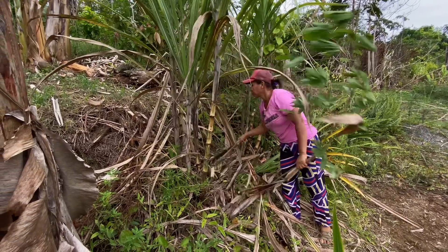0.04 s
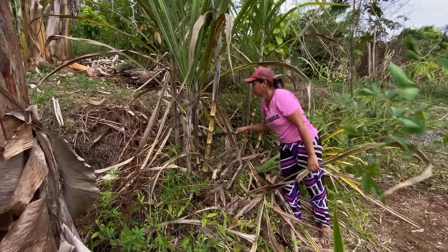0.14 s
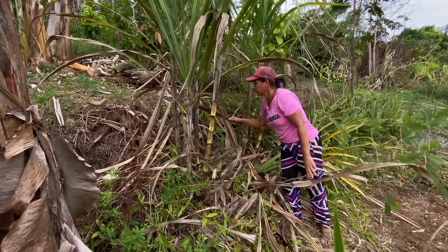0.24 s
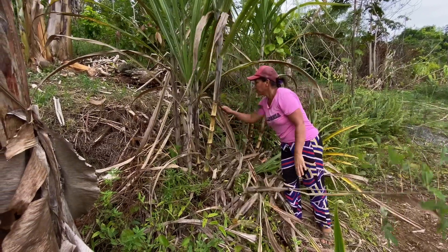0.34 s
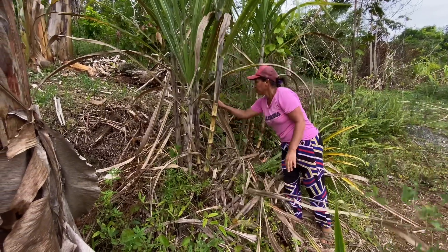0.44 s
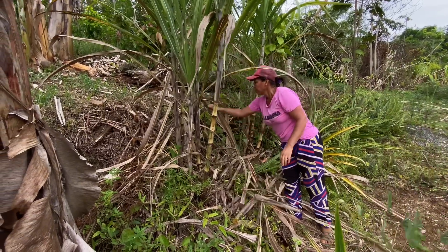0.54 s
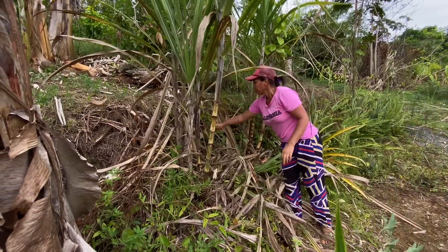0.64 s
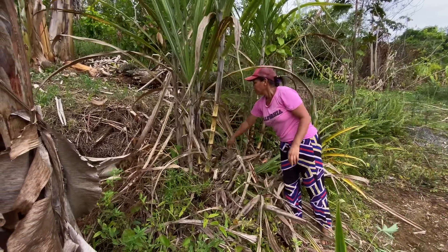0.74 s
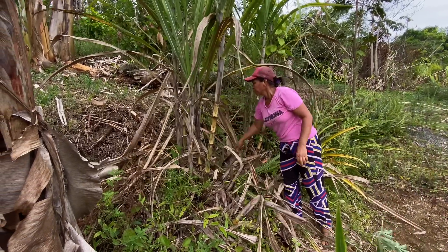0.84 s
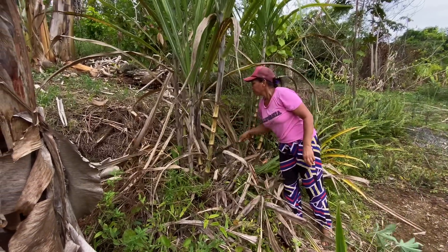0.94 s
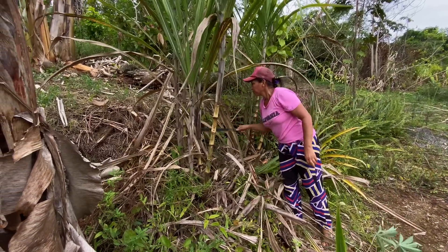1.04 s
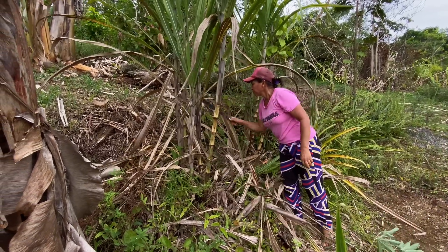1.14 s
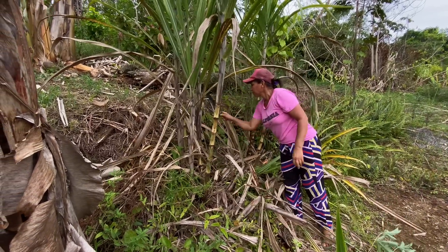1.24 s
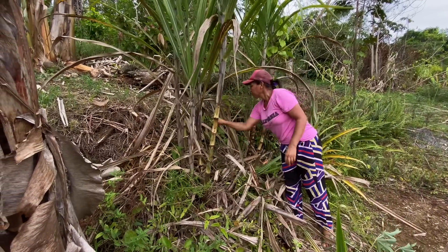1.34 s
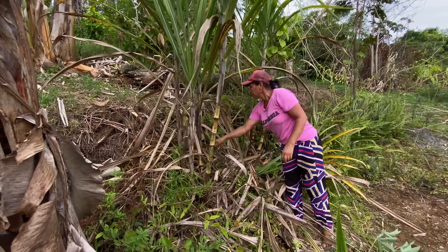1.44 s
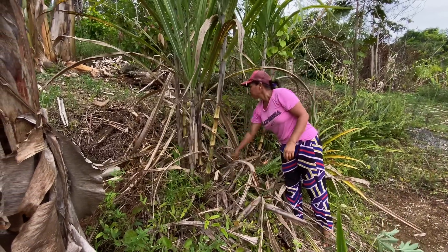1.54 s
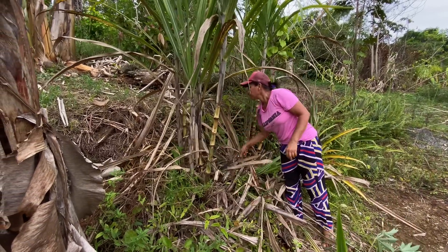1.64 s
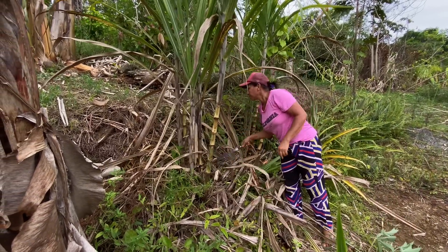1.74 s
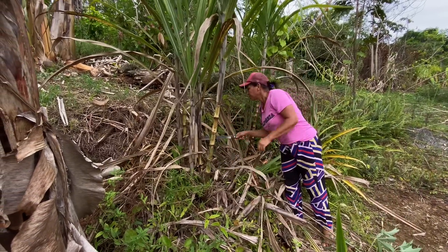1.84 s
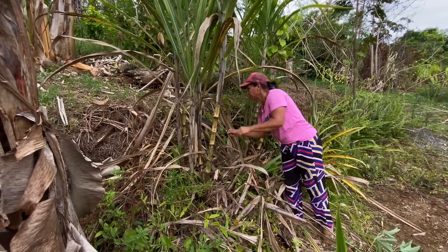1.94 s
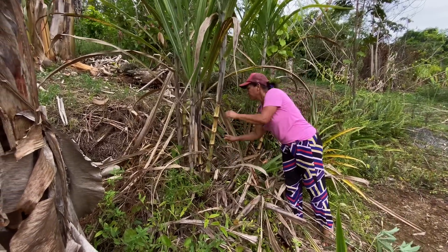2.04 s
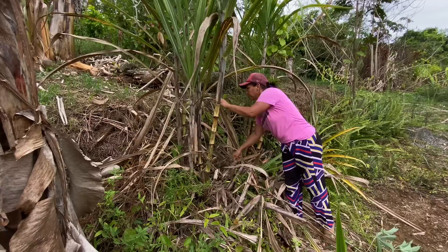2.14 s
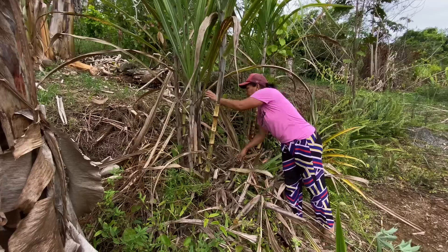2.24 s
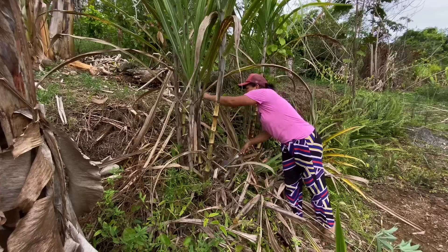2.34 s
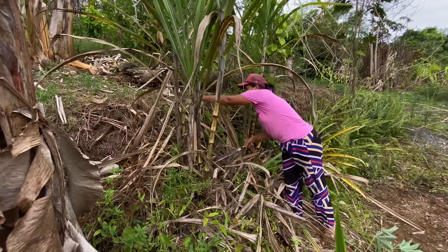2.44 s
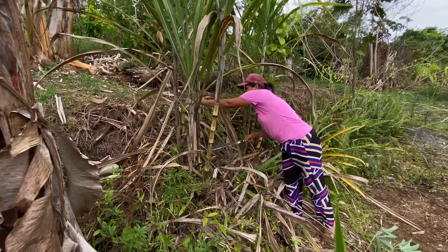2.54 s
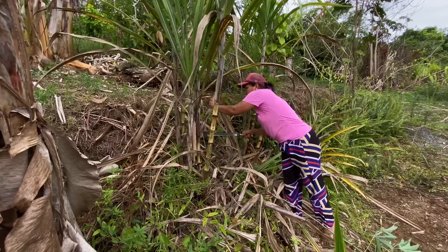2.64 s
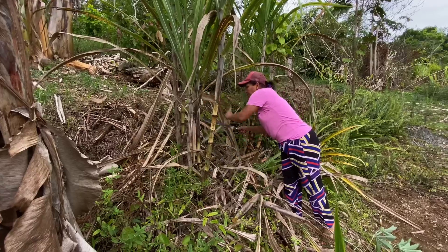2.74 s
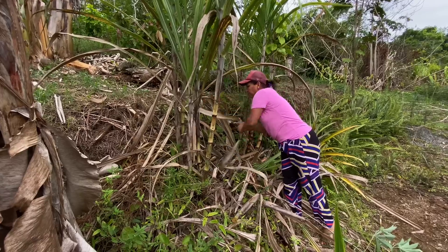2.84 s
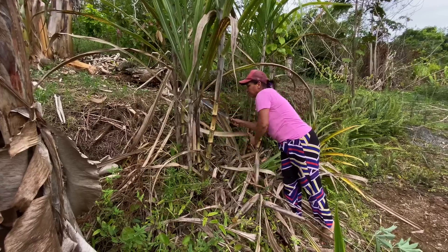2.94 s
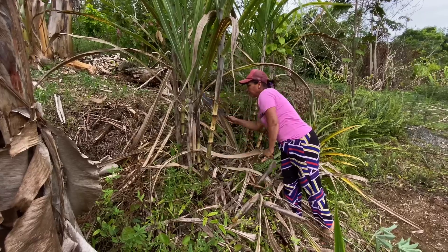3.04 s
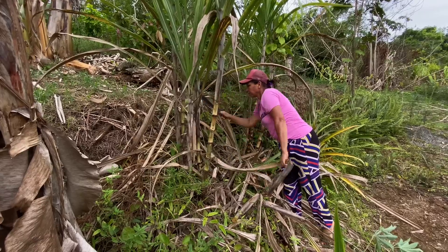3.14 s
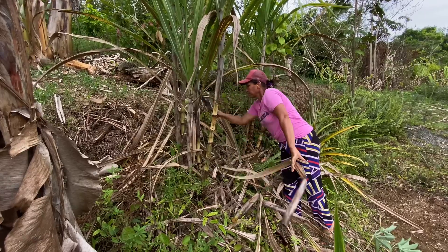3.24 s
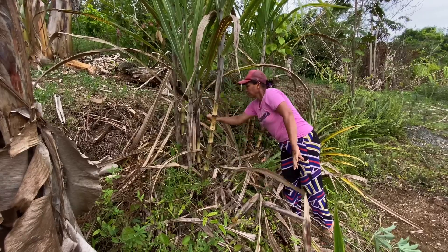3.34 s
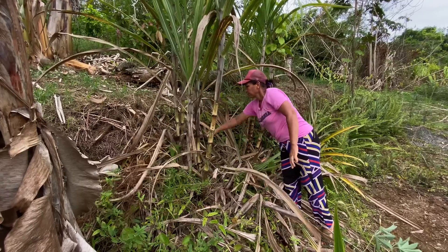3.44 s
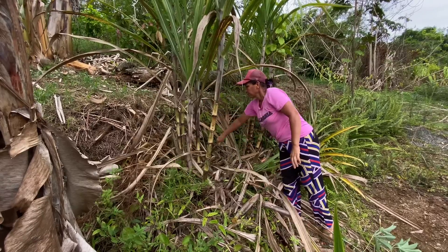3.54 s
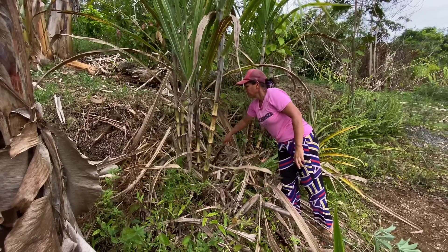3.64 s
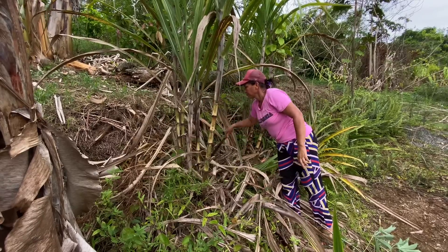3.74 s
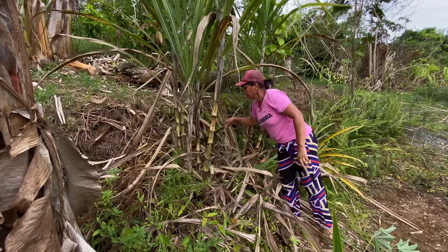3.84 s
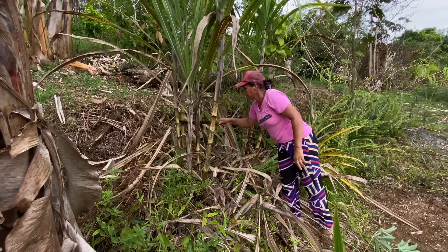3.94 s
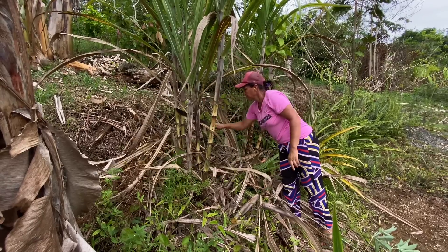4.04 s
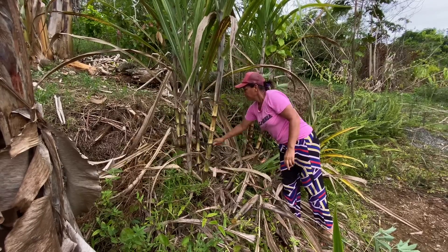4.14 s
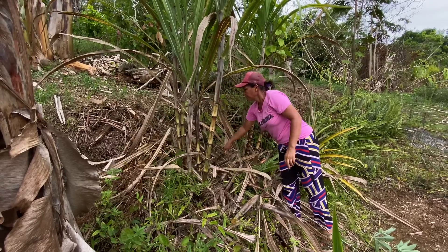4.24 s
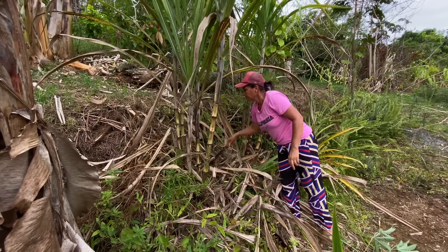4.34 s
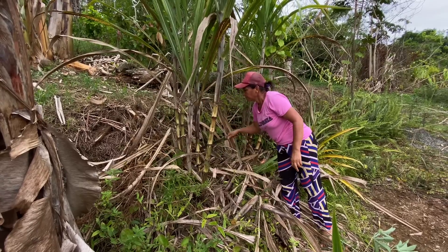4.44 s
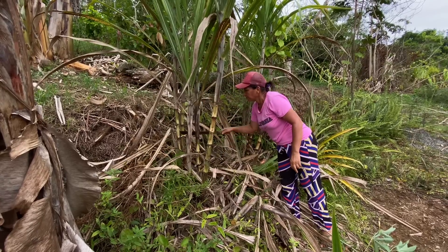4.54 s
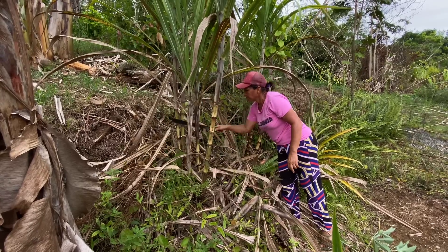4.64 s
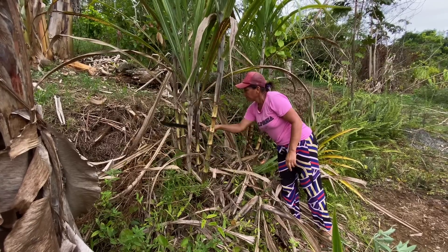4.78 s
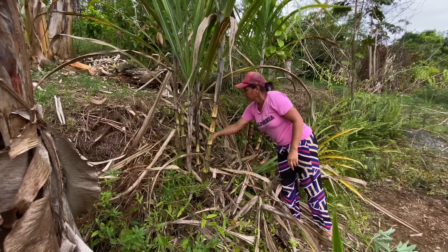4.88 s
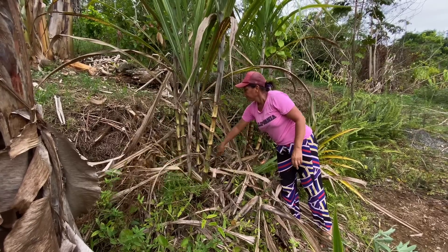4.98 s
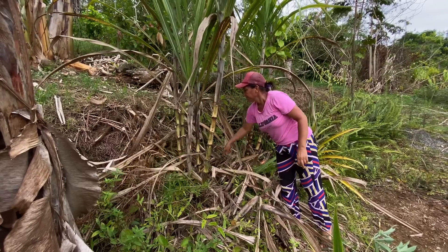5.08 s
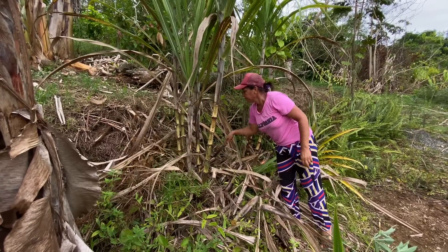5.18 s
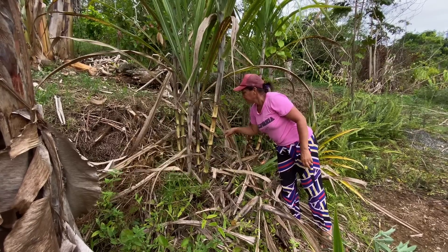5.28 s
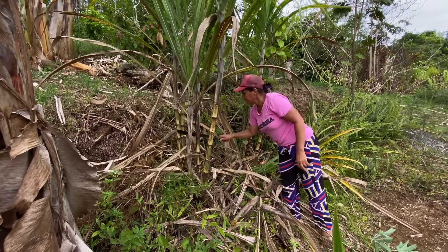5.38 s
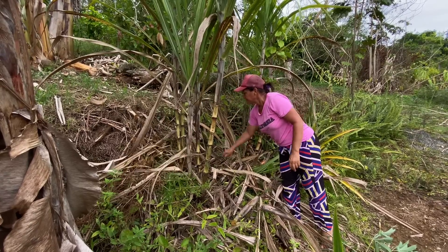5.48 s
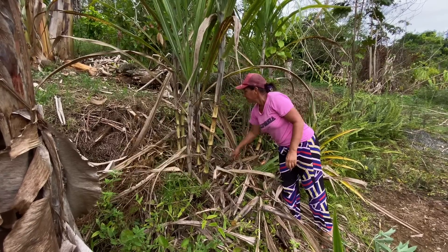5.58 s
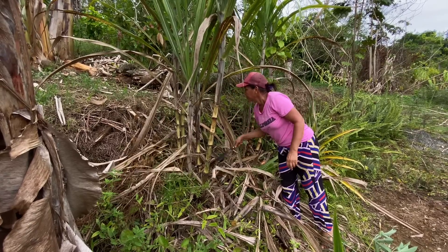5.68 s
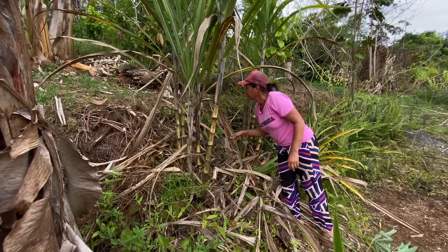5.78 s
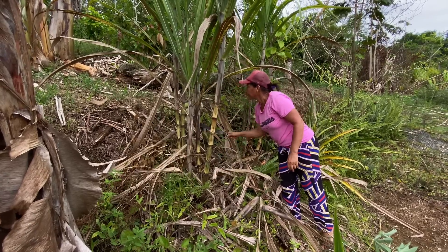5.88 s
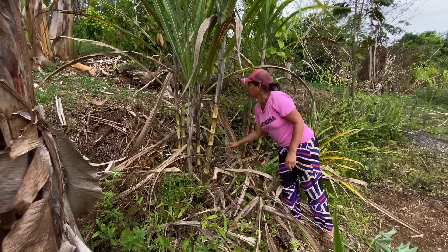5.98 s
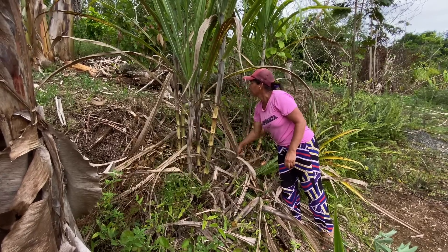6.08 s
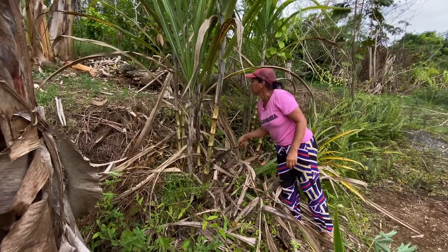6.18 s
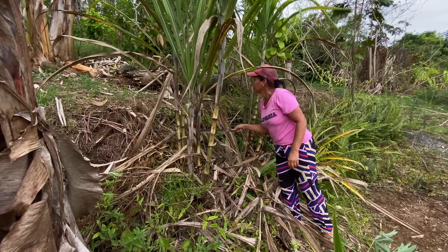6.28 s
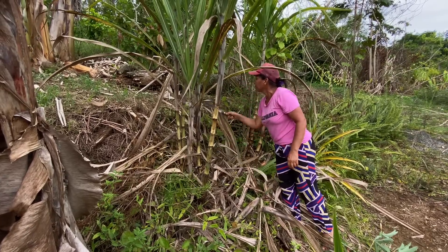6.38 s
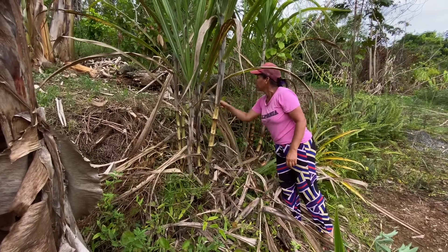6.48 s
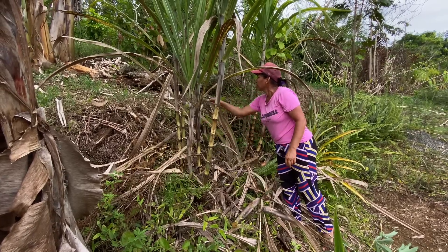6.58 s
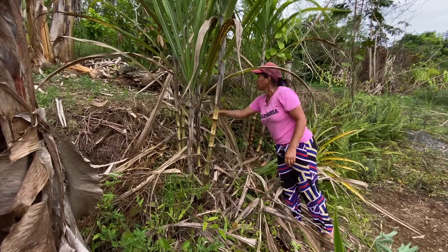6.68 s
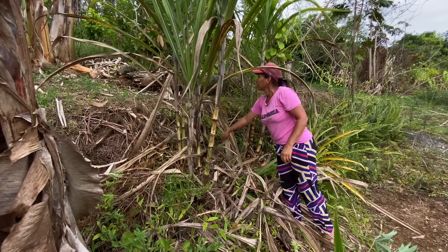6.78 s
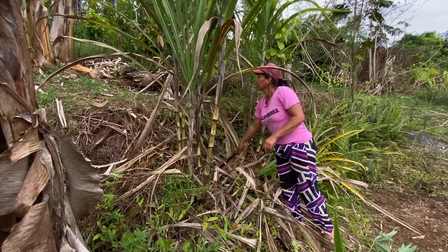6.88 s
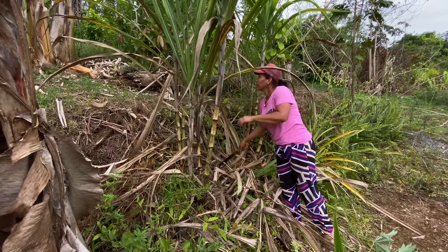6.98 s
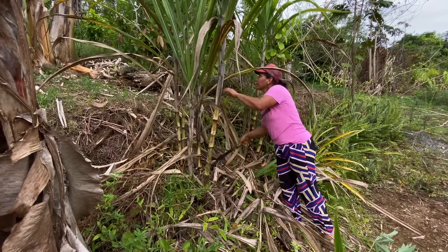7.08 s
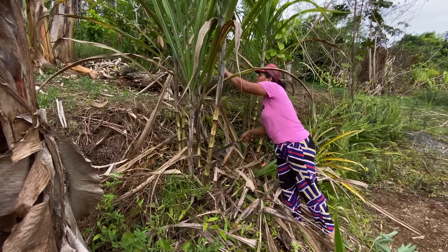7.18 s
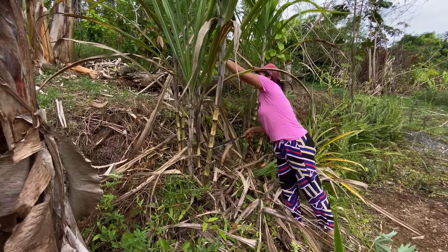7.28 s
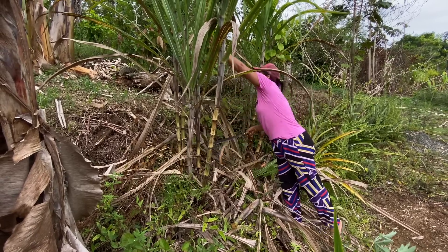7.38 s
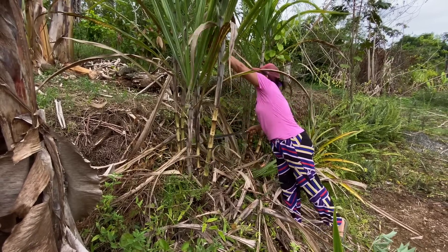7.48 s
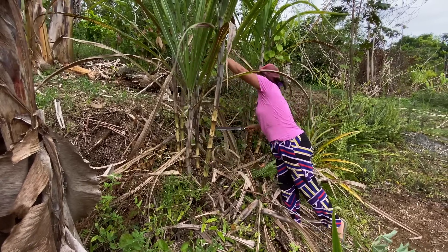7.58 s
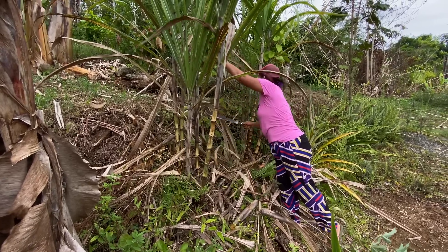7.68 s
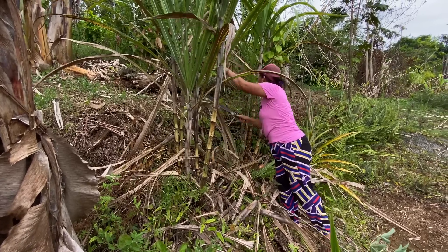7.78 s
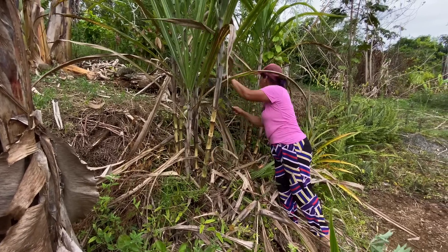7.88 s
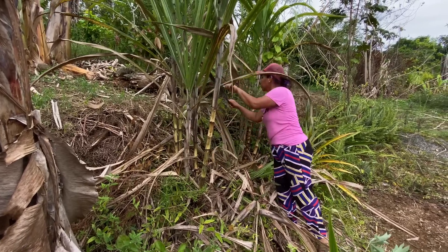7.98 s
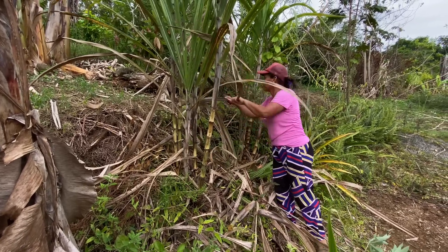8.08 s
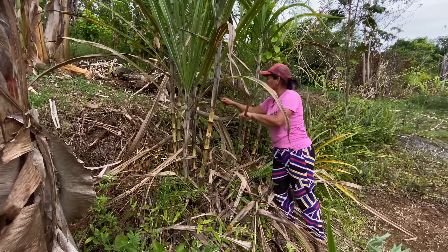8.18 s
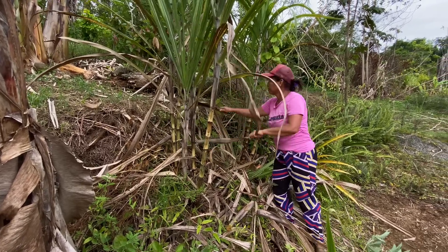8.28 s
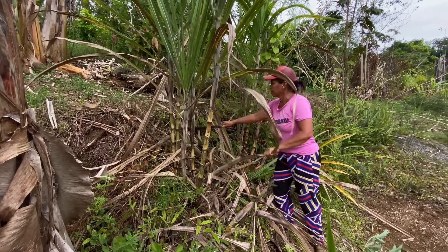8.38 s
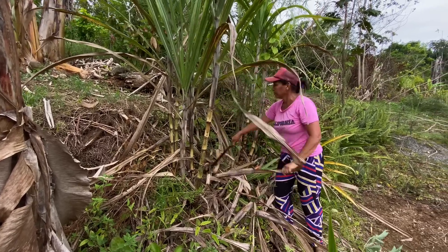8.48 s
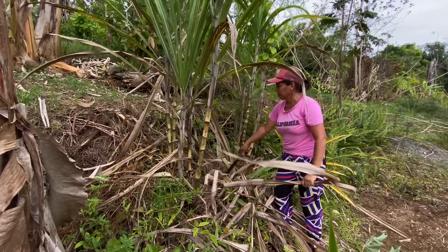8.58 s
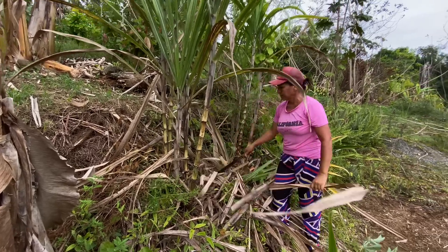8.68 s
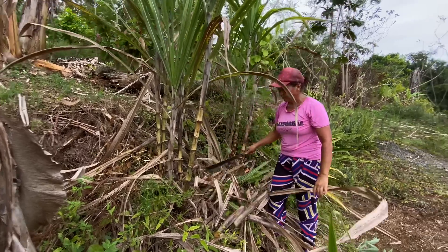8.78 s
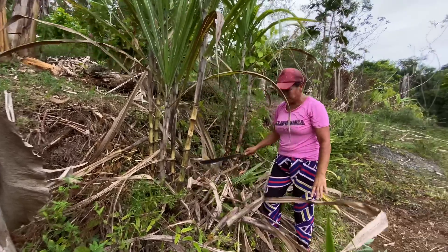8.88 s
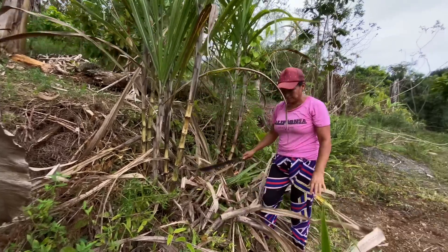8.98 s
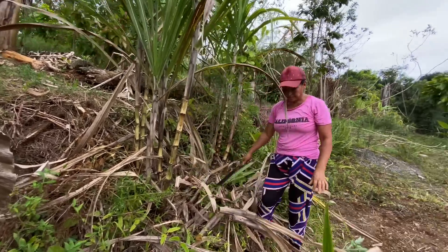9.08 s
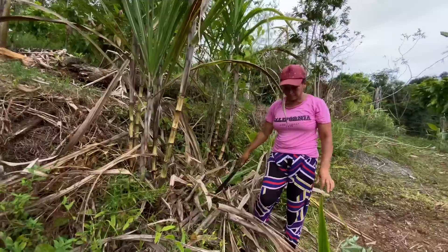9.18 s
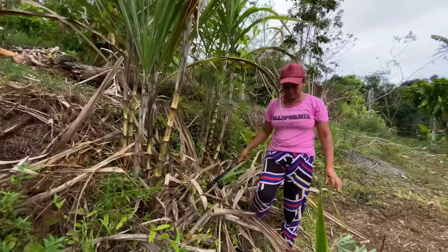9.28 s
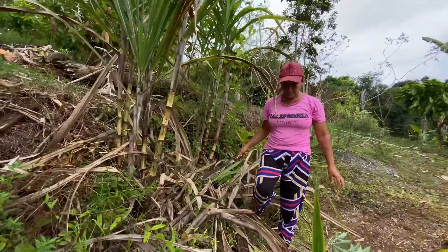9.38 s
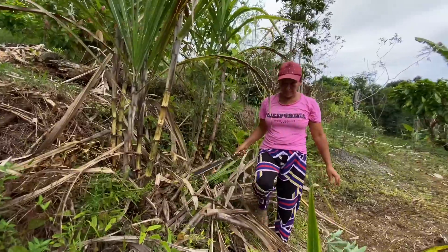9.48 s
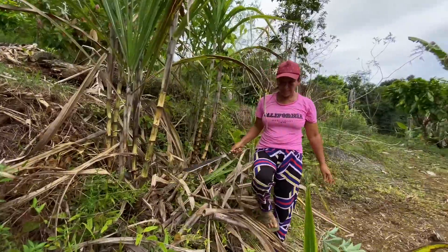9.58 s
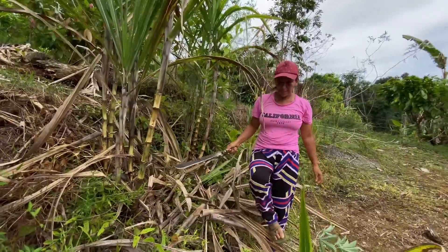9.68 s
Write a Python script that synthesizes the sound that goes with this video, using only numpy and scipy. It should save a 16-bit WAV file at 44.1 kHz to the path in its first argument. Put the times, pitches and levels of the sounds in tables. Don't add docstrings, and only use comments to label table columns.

```python
import sys
import numpy as np
from scipy import signal
from scipy.fft import rfft, irfft, next_fast_len
from scipy.io import wavfile
from scipy.ndimage import uniform_filter1d

SR = 44100
rng = np.random.default_rng(int(sys.argv[2]) if len(sys.argv) > 2 else 0)


def boost_factor(decibels):
    exponent = np.asarray(decibels, float) / 20
    return 10 ** exponent


def to_wav(sig):
    pcm = np.clip(np.atleast_2d(sig), -1, 1) * 32767
    pcm = np.round(pcm).astype(np.int16)
    wavfile.write(sys.argv[1], SR, pcm.T)


N = 428652

# start in seconds, rustle in dB, shaking in seconds,
# settling in dB per second, ribs in dB relative to the rustle.
STROKES = [(0.0, -31, 0.011, 43, -7.5), (0.599, -29, 0.031, 46, -6), (1.37, -53, .02, 44, 3.5),
           (1.45, -37, 0.2, 119, -12), (2.146, -38, 0.052, 55, -5), (3.395, -28.5, 0.13, 56.5, -5.5),
           (4.187, -38.5, 0.015, 70.5, -4), (4.818, -38, 0.17, 41.5, -8.5), (5.49, -42.5, 0.13, 67, -6),
           (6.015, -40.5, 0.14, 38, -6.5), (6.672, -40.5, 0.27, 23, -7.5), (9.06, -36.5, 0.37, 35, -7)]
SHAKE_RISE_S = 0.035
JOLTS_PER_S, JOLT_S, JOLT_DB = 60, 0.012, 1.2

# time in seconds, rustle in dB, ribs in relative dB.
HANDS = [(.3, -59, 12), (.5, -49, -3.5), (1.3, -67.5, -3.5), (1.72, -58.5, 2.5), (1.9, -63.5, -2.5),
         (2.1, -60, -3.5), (2.3, -53, -6), (2.57, -48, -8), (2.7, -44.5, -6), (2.8, -43, -1.5),
         (2.862, -49, -3), (2.92, -48, 2), (3.1, -45, -9), (3.3, -43.5, -5), (3.365, -46, -10),
         (3.6, -85, -4), (7.3, -95, 13), (7.46, -60, 3), (7.56, -55.5, 0), (7.68, -45, -19),
         (7.73, -43.5, -6), (7.8, -32, -11), (8.0, -42.5, -4), (8.32, -31.5, -13), (8.42, -46.5, -3.5),
         (8.55, -39, -3), (8.78, -47.5, -6.5), (9.03, -48, -3), (9.2, -73, -5)]

# peak in seconds, crackle in dB, knock in relative dB,
# knock pitch in Hz, time to fall 60 dB in seconds.
SNAPS = [(1.399, -19.5, -5, 1070, 0.15), (2.589, -44.5, 6.5, 430, 0.092), (2.618, -29.5, -12, 1710, 0.068),
         (2.813, -25, -8.5, 1990, 0.057), (2.875, -34, -2.5, 2100, 0.28), (3.036, -32.5, -6, 1470, 0.068),
         (3.379, -24, -0.5, 497, 0.069), (4.173, -28, -4, 900, 0.16), (4.719, -58, 13, 2050, 0.12),
         (5.497, -19, -7, 1570, .19), (6.0, -31.5, -6, 960, 0.013), (6.021, -24.5, -4.5, 930, 0.45),
         (7.061, -34.5, -10, 1340, 0.13), (7.496, -35, -19, 1280, 0.23), (7.683, -28, -5, 1780, 0.11),
         (7.741, -18.5, -5, 2060, 0.032), (7.756, -26, -1.5, 2200, 0.054), (7.798, -23.5, -3, 520, 0.12),
         (7.833, -22, -7.5, 2060, 0.11), (7.909, -31, -13, 1700, 0.33), (8.461, -33.5, -4, 1700, 0.081),
         (8.487, -28, -12, 1044, 0.035)]
CUTS = [(.556, -29, -6, 443, 0.37), (.587, -15.5, -10.5, 1550, 0.042), (.604, -12.5, -7.5, 1880, 0.15),
        (.677, -18, -6.5, 980, 0.1), (.712, -24, -9, 1380, 0.29), (2.14, -31, -3, 1370, 0.065),
        (2.159, -14.5, -3, 1670, 0.085), (2.839, -35, -4, 530, 0.065), (3.417, -28, 2.5, 1070, 0.025),
        (3.544, -30, -1, 1690, 0.06), (4.205, -26, -1.5, 640, 0.12), (4.806, -34.5, -16.5, 1570, 0.37),
        (4.879, -25, -7.5, 507, 0.048), (5.478, -41.5, -4, 1620, 0.45), (5.516, -20.5, -4.5, 520, 0.069),
        (6.761, -25, -2.5, 523, 0.031), (6.793, -24, -3.5, 980, 0.3), (6.887, -34.5, -15, 1170, 0.21),
        (7.633, -34, -15, 1270, 0.012), (8.372, -37, -1.5, 1660, 0.093), (9.046, -37, -8, 655, 0.054),
        (9.093, -25, -4.5, 1570, 0.37)]
TEARS = [(.061, -40, 1.5, 1560, 0.49), (.362, -33.5, -10, 2280, 0.31), (.645, -22.5, -2.5, 1380, 0.41),
         (.756, -25.5, -1.5, 1460, 0.11), (1.355, -44, -3, 664, 0.14), (1.447, -20, -4.5, 1540, 0.23),
         (1.489, -24, -4, 2000, 0.28), (3.067, -36, -4.5, 2500, 0.14), (3.427, -18.5, -11.5, 540, 0.72),
         (3.467, -18.5, -13, 2280, 0.38), (3.566, -28, -6.5, 950, 0.12), (3.595, -30.5, -6, 1014, 0.05),
         (4.198, -25, -16, 613, 0.18), (4.894, -23.5, -10.5, 1530, 0.36), (4.953, -26.5, -10, 1450, 0.13),
         (4.977, -26, -4.5, 1000, 0.094), (6.036, -19.5, -7.5, 1830, 0.23), (6.308, -37.5, -13.5, 446, 0.2),
         (6.718, -35, -8, 1240, 0.12), (6.741, -25, -7.5, 567, 0.25), (6.82, -20.5, -12.5, 920, 0.21),
         (7.947, -36, -7, 1800, .13), (8.354, -31, -4.5, 2240, 0.03), (8.51, -24.5, -5, 1885, 0.28)]
# peak in seconds, crackle in dB, knock pitch in Hz,
# time to fall 60 dB in seconds.
BRUSHES = [(1.625, -37.5, 2500, 0.17), (2.271, -36, 1500, 0.32), (2.752, -40, 2600, 0.079),
           (3.178, -42, 2580, .051), (3.255, -38.5, 2220, 0.27), (3.829, -37, 705, 0.57),
           (5.207, -44.5, 1240, 0.085), (6.982, -33, 2440, .035), (7.16, -47, 1480, .3),
           (7.435, -41.5, 1150, 0.36), (7.574, -41.5, 1520, 0.11), (7.649, -33.5, 860, 0.077),
           (8.071, -35.5, 1630, 0.7), (8.246, -35, 1970, 0.62), (8.759, -37, 2020, 0.35),
           (9.334, -30.5, 2140, 0.79), (9.547, -34.5, 2070, 0.29), (9.594, -35, 1440, 0.27),
           (9.671, -35, 670, .2)]
SNAP_RISE_S, CUT_RISE_S, TEAR_RISE_S, BRUSH_RISE_S = 0.0054, 0.016, 0.035, 0.017
BRUSH_KNOCK_DB = -6.5

# start in seconds, peak in dB.
BREAKS = [(0.5825, -17), (1.394, -7), (2.1267, -28), (2.619, -21), (2.812, -17), (3.0138, -11.5),
          (3.037, -13), (3.376, -13), (3.458, -15), (4.171, -17.5), (7.0586, -11.5), (7.4985, -15.5),
          (7.6795, -15.5), (7.7367, -5.5), (7.795, -1), (7.836, -13)]
# frequency in Hz, level in dB.
EDGE_COLOUR = [(300, -38.5), (1000, -14), (2000, -10.5), (3500, -2.5), (5000, 3), (7000, 1), (9000, 2.5),
               (12000, 1), (15000, -1), (16500, -6.5)]
# frequency in Hz, level in dB.
RIB_COLOUR = [(40, -33.5), (80, -11.5), (150, -3.5), (320, -6), (550, -1.5), (800, -3.5), (1100, -1),
              (2000, 0.5), (3000, -1), (5000, -27)]

# start in seconds, peak in dB, pitch in Hz,
# time to fall 60 dB in seconds.
SPLITS = [(0.3618, -17.5, 2280, 0.038), (0.411, -33, 8680, 0.037), (0.601, -6, 2100, 0.025),
          (0.6274, -11, 4940, 0.034), (0.648, -12, 1750, 0.041), (0.6772, -9, 6950, 0.043),
          (1.292, -36, 6000, 0.043), (2.157, -8.5, 1620, 0.036), (2.3456, -36.5, 1900, 0.04),
          (2.4523, -32, 5250, 0.048), (2.4982, -29, 10700, 0.034), (2.54, -33, 7190, 0.04),
          (2.7445, -27, 11400, 0.036), (2.809, -21.5, 1760, 0.033), (3.0547, -22, 11300, 0.045),
          (3.0616, -18, 11200, 0.037), (3.0702, -25, 10600, 0.034), (3.1737, -29, 10600, 0.04),
          (3.412, -8.5, 6370, 0.037), (3.427, -6.5, 7600, 0.052), (3.4568, -8, 7840, 0.04),
          (3.468, -21, 2410, 0.026), (3.477, -10, 7300, 0.059), (4.797, -29, 8200, 0.034),
          (4.898, -18, 4080, 0.044), (4.9666, -35, 1490, 0.029), (5.105, -26, 4660, 0.091),
          (5.183, -30.5, 2080, 0.048), (5.2074, -30.5, 5990, 0.067), (5.283, -31, 6430, 0.04),
          (5.493, -12, 1970, 0.045), (6.031, -7, 4260, 0.056), (6.306, -24, 10700, 0.058),
          (6.4393, -34, 7070, 0.07), (6.657, -38, 1300, 0.37), (6.806, -13, 6000, .04),
          (6.829, -22, 5530, 0.035), (7.5677, -29, 7260, 0.063), (7.68, -27, 1830, 0.044),
          (8.148, -20.5, 1830, 0.038), (8.2325, -22, 1680, 0.049), (8.8358, -31, 6050, 0.044),
          (8.885, -31, 2270, 0.04), (8.937, -31, 6220, 0.045), (9.258, -20, 2370, 0.055),
          (9.3414, -32, 2140, 0.035), (9.5876, -29, 6500, 0.047), (9.601, -29, 5500, .03),
          (9.625, -25, 4360, 0.04)]
SPLIT_RISE_S, SPLIT_DB, SPLIT_BARE_DB = 0.00055, -11, -9
SPLIT_WIDE = 0.29

# start in seconds, peak in dB, pitch in Hz,
# time to fall 60 dB in seconds.
BLOWS = [(0.598, -12, 1910, 0.036), (.627, -21, 905, 0.043), (.675, -18, 1033, .05), (.753, -18, 1490, .04),
         (1.397, -18, 900, 0.037), (1.438, -18.5, 1430, 0.071), (1.445, -16, 1530, 0.029),
         (1.481, -21, 920, .05), (1.494, -28, 2100, 0.024), (2.137, -29, 1530, 0.043),
         (2.1502, -7, 1380, 0.028), (2.156, -10, 1754, 0.034), (2.162, -16, 2090, .04),
         (2.164, -23.5, 286, 0.072), (2.152, -9, 4040, .03), (2.159, -13, 4480, 0.032),
         (2.166, -19, 4700, 0.027), (2.618, -23.5, 1720, 0.027), (.646, -15, 3180, 0.031),
         (.678, -14.5, 3270, .03), (2.177, -39, 670, 0.035), (3.378, -21, 880, 0.031),
         (3.457, -16.5, 988, 0.072), (4.17, -24, 902, 0.061), (4.2005, -18.5, 656, 0.075),
         (4.21, -25, 624, 0.033), (4.216, -29.5, 247, 0.022), (4.205, -29.5, 131, 0.1),
         (5.4938, -6, 4160, 0.022), (5.4955, -7.5, 5800, 0.015), (5.497, -33, 1980, 0.021),
         (5.511, -15, 1950, 0.02), (5.5129, -15.5, 540, 0.052), (6.037, -16, 1414, 0.045),
         (6.044, -14, 580, 0.02), (6.04, -28.5, 140, 0.084), (6.791, -19.5, 1130, 0.079),
         (7.681, -33, 1790, 0.024), (7.695, -32, 2000, 0.026), (7.7362, -13.5, 2140, 0.039),
         (7.755, -24, 2100, 0.033), (7.795, -12.5, 2220, 0.02), (7.797, -30, 4560, 0.018),
         (7.838, -25, 1760, 0.027), (7.837, -22, 4480, .02), (8.508, -23, 1890, 0.033),
         (9.049, -33, 920, 0.023), (9.091, -19, 6240, .02), (9.094, -23.5, 596, .04),
         (9.1024, -14, 1480, 0.017), (9.107, -21.5, 393, 0.038), (9.123, -25.5, 1165, 0.057)]
# multiple of the pitch, level in dB.
WALL_PARTIALS = [(0.622, -13.5), (0.998, -6), (1.13, -13), (1.55, -13.5)]

# start in seconds, level in dB.
STALK_HITS = [
    (2.2874, -13.5),
    (2.2894, -20),
    (2.2907, -16),
    (2.295, -19),
]
# pitch in Hz, level in dB, time to fall 60 dB in seconds.
STALK_PARTIALS = [(930, -17.5, 0.032), (1240, -15, 0.0097), (1530, 0, 0.029), (1970, -20, 0.021),
                  (2215, -1, 0.018), (2970, 1, 0.015), (3740, -19.5, 0.025)]

# start in seconds, peak in dB, pitch in Hz.
TICKS = [(0.3616, -44, 2300), (0.5142, -34, 2180), (2.9294, -20, 2570), (2.9637, -31, 2550),
         (2.9894, -36, 2560), (3.2524, -29, 2800), (3.287, -26, 2770), (3.3174, -38, 2820),
         (3.339, -26.5, 2970), (3.6674, -40, 1910), (7.947, -28, 1840), (8.085, -36, 1580),
         (8.103, -33, 1870), (8.1574, -28, 2010), (8.263, -31, 1700), (9.6717, -21, 2430),
         (9.709, -22.5, 2390)]
# multiple of the pitch, level in dB.
RIB_PARTIALS = [(.33, -9.5), (.68, -8), (1.0, 2.5), (1.12, -1.5), (1.5, -14)]
TICK_T60_S, TICK_DB, TICK_SWELL_S = 0.017, 0.5, 0.0019

# start in seconds, level in dB.
TOUCHES = [
    (4.715, 1.5),
    (4.721, 3.5),
    (4.729, -11),
]
# pitch in Hz, level in dB, time to fall 60 dB in seconds.
TOUCH_PARTIALS = [(378, -12, 0.11), (550, -3.5, 0.11), (813, -10, 0.066), (1210, -11, 0.059),
                  (1680, -10.5, 0.058), (2060, 0.5, 0.031), (3430, 2, .05), (3908, -12, .06),
                  (5140, -11, 0.032)]
TOUCH_DB = -42.5
# pitch in Hz, level in dB, time to fall 60 dB in seconds.
BLADE_PARTIALS = [(5249, -54, .6), (7230, -56, .5)]
BLADE_S = 4.726

# frequency in Hz, lead of the left in radians,
# likeness from 0 to 1, left over right in dB.
PORTS = [(0, -0.15, 1, 2.5), (443, 0.55, 0.91, -.5), (1060, 1.03, 0.89, -3.5), (2100, 1.5, 0.3, -3.5),
         (3020, 2.5, 0.38, 3.5), (3800, 0.95, 0.2, 6.5), (5400, 3.5, 0.3, 1.5), (5930, 5.5, 0.68, 5),
         (8660, 4, 0.52, 0), (9140, 4.5, 0.82, -2), (10260, 0.43, 0.38, -2.5), (11470, 0.5, 0.68, -0.5),
         (12930, -3, 0.6, 0), (13640, -1.5, 1, 0), (14250, -5, .9, 0)]
# low edge in Hz, high edge in Hz, change in dB.
SUM_GAPS = [(9050, 9230, -22), (12560, 13900, -28), (15950, 22050, -45), (16850, 22050, -60)]
# low edge in Hz, high edge in Hz, change in dB.
DIFFERENCE_GAPS = [(9950, 11900, -9.5), (14550, 26000, -18), (16100, 20000, -10)]

# centre in seconds, level in dB.
WIND = [(0.7, -53), (1.03, -60), (1.51, -57), (2.17, -51), (2.36, -62), (3.24, -60), (3.87, -63),
        (4.58, -62.5), (5.92, -61), (6.38, -60), (8.3, -52.5), (8.62, -55), (2.96, -55), (3.47, -58),
        (4.23, -51.5), (4.96, -47.5), (5.53, -45), (6.06, -49), (6.82, -48), (8.04, -53), (8.14, -43.5),
        (8.84, -47), (9.02, -43.5), (9.13, -49), (9.34, -42), (9.45, -39.5), (9.54, -43.5)]
WIND_HZ, WIND_WIDTH_HZ, WIND_LEFT_DB = 61, 39, 10.5
BUMP_S, BREEZE_DB = 0.033, -78

# frequency in Hz, level in dB per Hz.
FIELD_COLOUR = [(18, -45), (30, 13), (1120, 2.5), (2220, -9), (4070, -11.5), (6050, -5), (7280, 8),
                (9230, -45), (10800, -29), (15200, -24), (16500, -29)]
FIELD_DB, INSECT_DB = -63, -62
INSECT_HZ, INSECT_WIDTH_HZ = 7350, 650


def leaves():
    clumps = jolting()
    edges, ribs = rustle() * clumps
    for s, db, rel_db, _, t60, rise in work():
        add(edges, s - rise, (boost_factor(db) * burst(t60, rise)) ** 2)
        add(ribs, s - rise, (boost_factor(db + rel_db - 1.5) * burst(1.18 * t60, rise)) ** 2)
    for s, db in BREAKS:
        add(edges, s - 0.0005, (boost_factor(db - 10.5) * burst(0.017, 0.0005)) ** 2)
    edges = np.sqrt(edges) * clumps
    ribs = np.sqrt(ribs) * clumps

    fine = cracks(edges, 1430, 15200, per_s=6000, spread_db=0.0, cycles=0.96, count=8)
    ticks = cracks(edges, 2050, 12640, per_s=500, spread_db=3.5, cycles=1.45, count=6)
    hiss = edges * rng.standard_normal((2, N))
    fizz = boost_factor(-9.0) * fine + boost_factor(-12.0) * ticks + boost_factor(-3.5) * hiss
    for s, db in BREAKS:
        first_instant = boost_factor(db - 2.5) * np.array([[1.0], [0.6]])
        add(fizz, s + 0.0008, first_instant)

    taps = cracks(ribs, 278, 3300, per_s=580, spread_db=4.0, cycles=1.0, count=8)
    body = boost_factor(-17.5) * taps + coloured(ribs * rng.standard_normal((2, N)), RIB_COLOUR)
    bright = dappled(coloured(fizz, EDGE_COLOUR), patchy_db=0.5, size=256, broad_db=1.48)
    return bright + dappled(body, patchy_db=2.5, size=512)


def work():
    brushes = [(s, db, BRUSH_KNOCK_DB, hz, t60) for s, db, hz, t60 in BRUSHES]
    kinds = (SNAPS, SNAP_RISE_S), (CUTS, CUT_RISE_S), (TEARS, TEAR_RISE_S), (brushes, BRUSH_RISE_S)
    return [(*row, rise) for rows, rise in kinds for row in rows]


def rustle():
    t = np.arange(2 * SR) / SR
    edges = boost_factor(curve(HANDS, 1)) ** 2
    ribs = edges * boost_factor(curve(HANDS, 2)) ** 2
    for s, db, shaking, settling_db, rel_db in STROKES:
        rise = min(SHAKE_RISE_S, s + 1 / SR)
        settled = abs(settling_db) * np.maximum(t - rise - shaking, 0)
        power = (np.minimum(t / rise, 1) ** 2 * boost_factor(db - settled)) ** 2
        add(edges, max(s - rise, 0), power)
        add(ribs, max(s - rise, 0), boost_factor(rel_db) ** 2 * power)
    return np.array([edges, ribs])


def jolting():
    jolts = rng.exponential(1, N) ** 0.5 * (rng.random(N) < JOLTS_PER_S / SR)
    jolts = signal.lfilter([1], [1, -np.exp(-1 / (JOLT_S * SR))], jolts)
    return boost_factor(JOLT_DB * evened(jolts - jolts.mean()))


def cracks(level, lo_hz, hi_hz, per_s, spread_db, cycles, count):
    size = boost_factor(spread_db * np.minimum(rng.exponential(1, N), 4))
    happens = rng.random(N) < per_s / SR
    train = evened(size * happens) * rng.choice([-1.0, 1.0], (2, N)) * level
    kind = rng.integers(0, count, N)
    out = np.zeros((2, N))
    for k, hz in enumerate(np.linspace(lo_hz, hi_hz, count)):
        turns = np.arange(512) * hz / SR
        grain = np.sin(2 * np.pi * turns) * np.exp(-turns / cycles)
        grain /= np.linalg.norm(grain)
        out += signal.oaconvolve(train * (kind == k), grain[None], axes=1)[:, :N]
    return out


def splits():
    hiss, out = rng.standard_normal((2, N + SR)), np.zeros((2, N))
    for s, db, hz, t60 in SPLITS:
        shape = boost_factor(db + SPLIT_DB) * burst(t60, SPLIT_RISE_S)
        noise = hiss[:, round(s * SR):][:, :len(shape)]
        leaf = evened(resonate(noise, hz, SPLIT_WIDE * hz))
        bare = evened(np.diff(noise, prepend=0))
        add(out, s, shape * (leaf + boost_factor(SPLIT_BARE_DB) * bare))
    return out


def knocks():
    shake, out = rng.standard_normal((2, N + SR)), np.zeros((2, N))
    ratios = rng.uniform([0.35, 1.25], [0.75, 1.7], (len(work()), 2))
    for (s, db, rel_db, hz, t60, rise), (low, high) in zip(work(), ratios):
        shape = boost_factor(db + rel_db) * burst(0.59 * t60, rise)
        push = shape * shake[:, round(s * SR):][:, :len(shape)]
        rung = resonate(push, hz, width=46)
        rung += 0.35 * resonate(push, low * hz, width=43)
        rung += 0.16 * resonate(push, high * hz, width=45)
        hollow = 0.5 * resonate(push, hz, width=0.57 * hz)
        add(out, s - rise, rung + hollow)
    return boost_factor(14.0) * out


def blows():
    out = np.zeros(N)
    for s, db, hz, t60 in BLOWS:
        wall = [(k * hz, rel_db, max(t60, 0.008)) for k, rel_db in WALL_PARTIALS]
        add(out, s, boost_factor(db) * soft_start() * ringing(wall))
    return out


def stalk_taps():
    out = np.zeros(N)
    for s, db in STALK_HITS:
        add(out, s, boost_factor(db) * soft_start() * ringing(STALK_PARTIALS))
    return out


def rib_ticks():
    t, out = np.arange(SR // 10) / SR, np.zeros(N)
    for s, db, hz in TICKS:
        rib = [(k * hz, rel_db, TICK_T60_S) for k, rel_db in RIB_PARTIALS]
        add(out, s, boost_factor(db + TICK_DB) * np.minimum(t / TICK_SWELL_S, 1) * ringing(rib))
    return out


def blade():
    t, out = np.arange(SR // 10) / SR, np.zeros(N)
    for s, db in TOUCHES:
        add(out, s, boost_factor(TOUCH_DB + db) * soft_start() * ringing(TOUCH_PARTIALS))
    steel = ringing(BLADE_PARTIALS) * np.minimum(t / 0.0072, 1)
    add(out, BLADE_S, steel[:int(0.075 * SR)])
    return out


def soft_start():
    return 1 - np.exp(-np.arange(SR // 10) / SR / 0.00044)


def ringing(modes):
    t = np.arange(SR // 10) / SR
    return sum(boost_factor(db - 60 * t / t60) * np.sin(2 * np.pi * hz * t) for hz, db, t60 in modes)


def ports(pair):
    f, lead, same, left_db = np.transpose(PORTS)
    size = next_fast_len(N)
    hz = np.fft.rfftfreq(size, 1 / SR)
    same = np.clip(np.interp(hz, f, same), 0, 1)
    shared, apart = rfft(pair, size, axis=1) * np.sqrt([(1 + same) / 2, (1 - same) / 2])
    half = np.exp(0.5j * np.interp(hz, f, lead)) * boost_factor(np.interp(hz, f, left_db) / 2)
    return irfft(np.array([(shared + apart) * half, (shared - apart) / half]), size, axis=1)[:, :N]


def wind():
    t = np.arange(N) / SR
    power = boost_factor(BREEZE_DB) ** 2
    power = power + sum(boost_factor(2 * db) * np.exp(-((t - s) / BUMP_S) ** 2) for s, db in WIND)
    air = rng.standard_normal((2, N))
    for _ in range(2):
        air = resonate(air, WIND_HZ, WIND_WIDTH_HZ)
    left, own = air / np.sqrt(uniform_filter1d(air ** 2, size=1500, axis=1) + 1e-12)
    pair = evened(np.array([left, 0.1 * left + 2.05 * own]))
    return np.sqrt(power) * pair * boost_factor([[WIND_LEFT_DB / 2], [-WIND_LEFT_DB / 2]])


def field():
    hush = coloured(rng.standard_normal((2, N)), FIELD_COLOUR)
    hush = boost_factor(FIELD_DB) * dappled(hush, patchy_db=4.0, size=1024)
    band = rng.standard_normal((2, N))
    for _ in range(2):
        band = resonate(band, INSECT_HZ, INSECT_WIDTH_HZ)
    tremble = evened(uniform_filter1d(rng.standard_normal(N), size=300))
    swell = evened(uniform_filter1d(rng.standard_normal(N), size=6000))
    return hush + boost_factor(INSECT_DB + 1.2 * tremble + 1.1 * swell) * evened(band)


def dappled(x, patchy_db, size, broad_db=0):
    z = signal.stft(x, nperseg=size)[2]
    chance = rng.standard_normal(z.shape[1:])
    patches = evened(uniform_filter1d(uniform_filter1d(chance, size=4, axis=0), size=4, axis=1))
    broad = evened(uniform_filter1d(uniform_filter1d(chance[::-1], size=9, axis=0), size=22, axis=1))
    shift_db = patchy_db * patches + broad_db * broad
    shift_db -= 0.115 * (patchy_db ** 2 + broad_db ** 2)
    return signal.istft(z * boost_factor(shift_db), nperseg=size)[1][:, :N]


def coloured(x, spectrum):
    f, db = np.transpose(spectrum)
    hz = abs(np.fft.fftfreq(4096, 1 / SR))
    log_gain = np.log(boost_factor(np.interp(np.log(hz + 1), np.log(f), db)))
    taps = np.fft.ifft(np.exp(np.conj(signal.hilbert(log_gain)))).real[:2048]
    return signal.oaconvolve(x, taps[None] / np.linalg.norm(taps), axes=1)[:, :N]


def resonate(x, hz, width):
    r = np.exp(-np.pi * width / SR)
    return 2 * signal.lfilter([1 - r], [1, -r * np.exp(2j * np.pi * hz / SR)], x).real


def burst(t60, rise):
    t60, rise = np.clip(t60, 0.012, 0.4), np.clip(rise, 0.0005, 0.05)
    t = np.arange(int((t60 + rise) * SR)) / SR
    return np.minimum(t / rise, 1) ** 2 * boost_factor(-60 * np.maximum(t - rise, 0) / t60)


def evened(x):
    return x / np.sqrt(np.mean(x ** 2) + 1e-20)


def curve(rows, column):
    rows = np.array(rows)
    return np.interp(np.arange(N) / SR, rows[:, 0], rows[:, column])


def add(mix, s, sound):
    part = mix[..., round(s * SR):][..., :sound.shape[-1]]
    part += sound[..., :part.shape[-1]]


def scene():
    struck = blows() + stalk_taps() + rib_ticks() + blade()
    struck = np.array([struck, np.roll(struck, 9)])
    cane = leaves() + splits() + knocks() + struck
    return ports(cane) + wind() + field()


def roll_off(x):
    return signal.sosfilt(signal.butter(12, 16990, fs=SR, output="sos"), x)


def record(dry):
    total_and_difference = np.array([dry[0] + dry[1], dry[0] - dry[1]]) / 2
    hz, _, z = signal.stft(total_and_difference, SR, nperseg=2048)
    treble_db = 10 * np.log10((abs(z[:, hz > 3000]) ** 2).mean((0, 1)) + 1e-14)
    steady = np.where(np.diff(treble_db, prepend=0) > 6.0, 0.45, 1)
    slide = uniform_filter1d(rng.standard_normal(len(steady)), size=3)
    hz = hz[:, None]
    gaps_db = np.zeros(z.shape)
    for gap_db, gaps in zip(gaps_db, (SUM_GAPS, DIFFERENCE_GAPS)):
        for lo, hi, db in gaps:
            inside = (hz > lo) & (hz < hi + 560 * slide)
            gap_db += db * steady * inside
    bass_cut = 1 / np.sqrt(1 + (41 / (hz + 1)) ** 9)
    total, difference = signal.istft(z * bass_cut * boost_factor(gaps_db), SR, nperseg=2048)[1][:, :N]
    return roll_off(np.array([total + difference, total - difference]))


dry = scene()
out = record(dry)
to_wav(out)
```